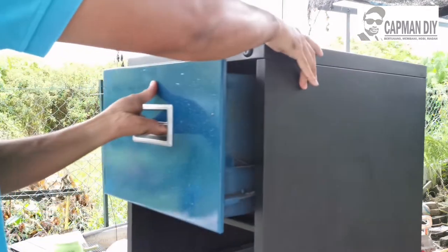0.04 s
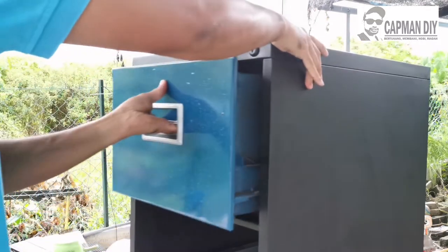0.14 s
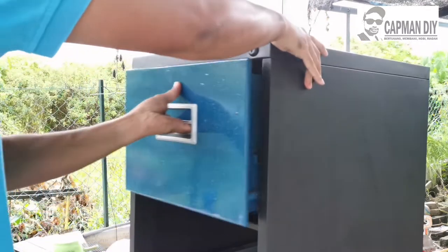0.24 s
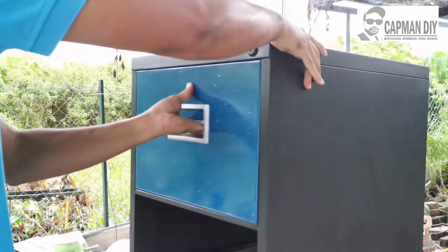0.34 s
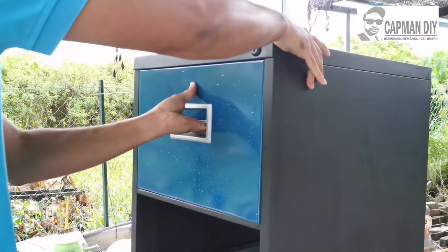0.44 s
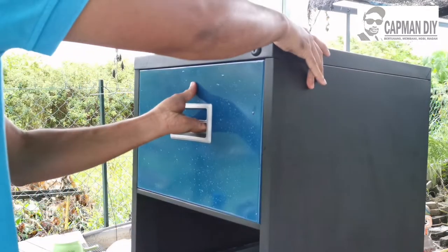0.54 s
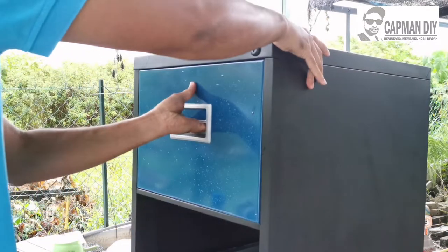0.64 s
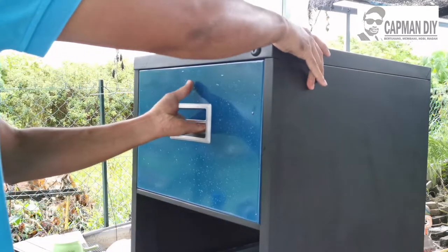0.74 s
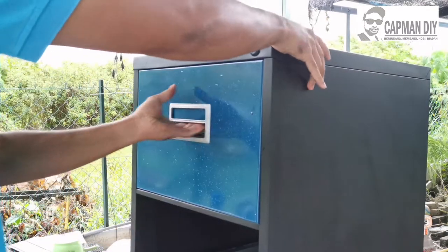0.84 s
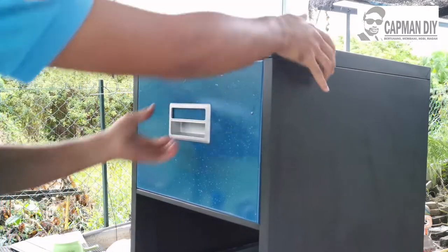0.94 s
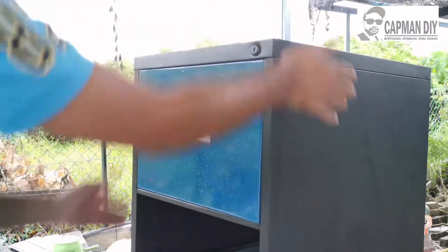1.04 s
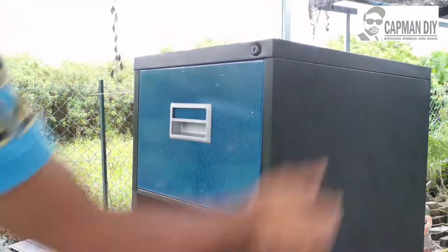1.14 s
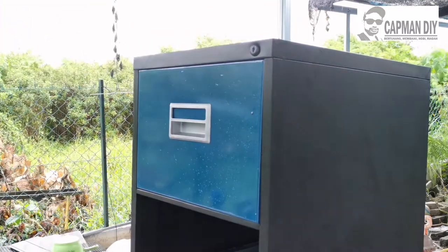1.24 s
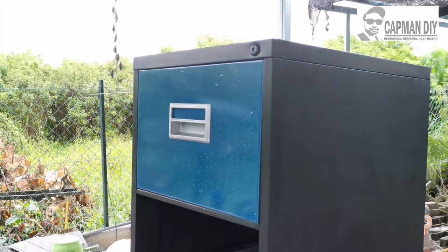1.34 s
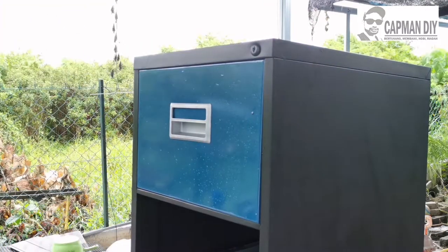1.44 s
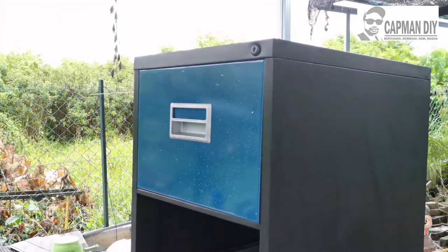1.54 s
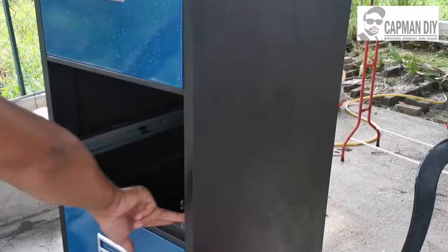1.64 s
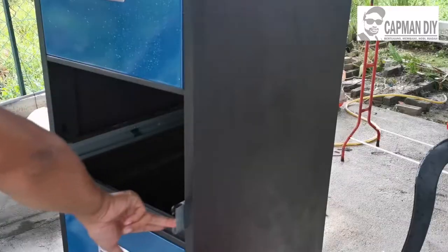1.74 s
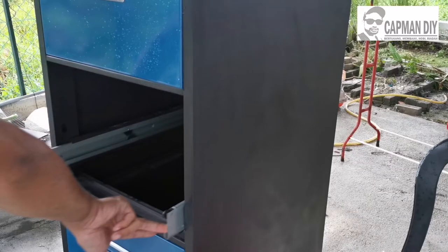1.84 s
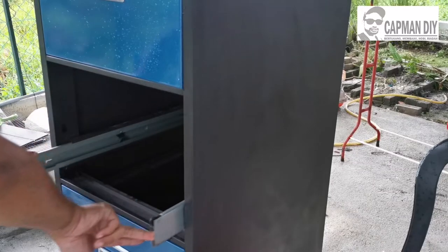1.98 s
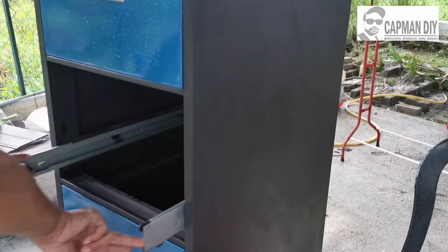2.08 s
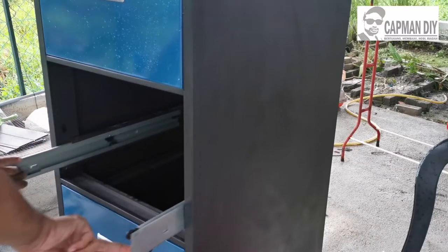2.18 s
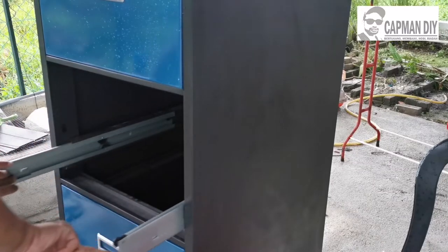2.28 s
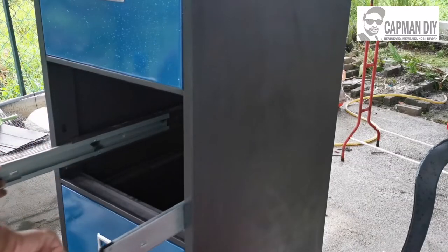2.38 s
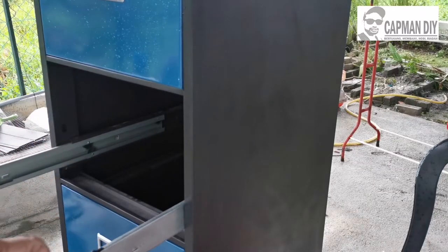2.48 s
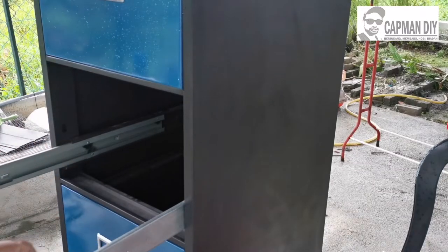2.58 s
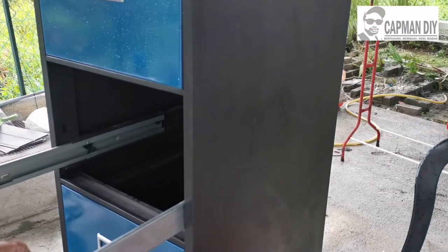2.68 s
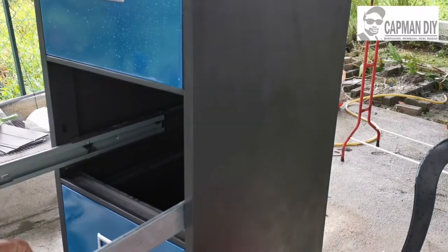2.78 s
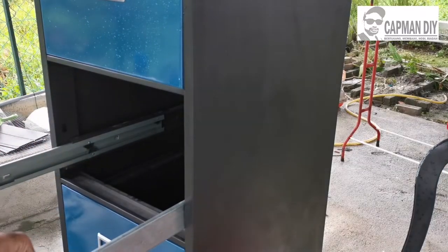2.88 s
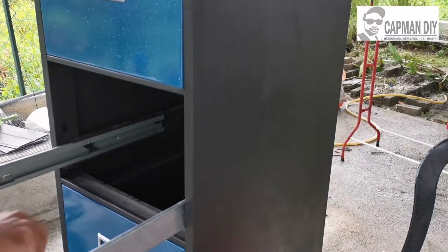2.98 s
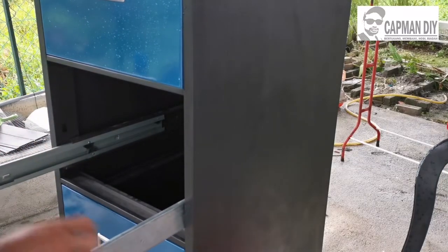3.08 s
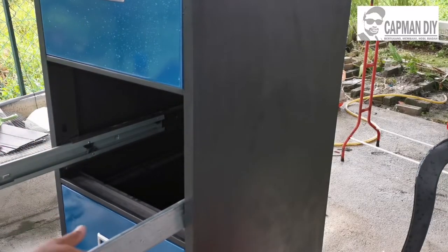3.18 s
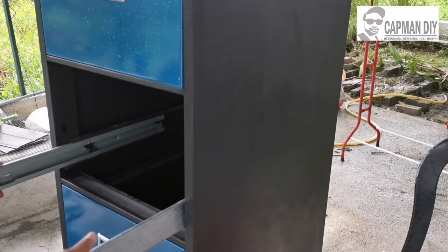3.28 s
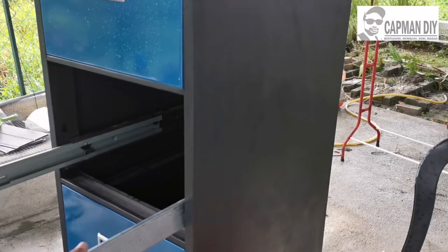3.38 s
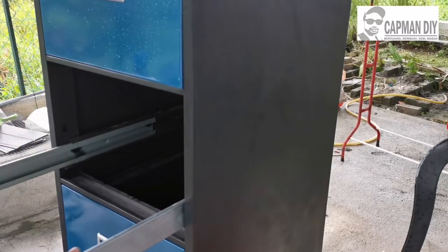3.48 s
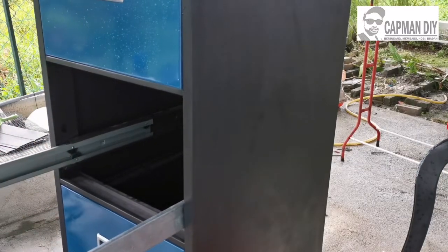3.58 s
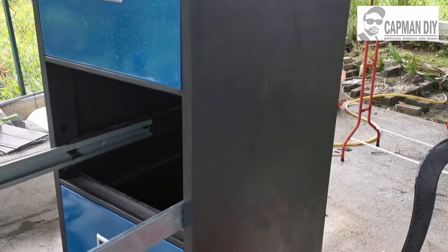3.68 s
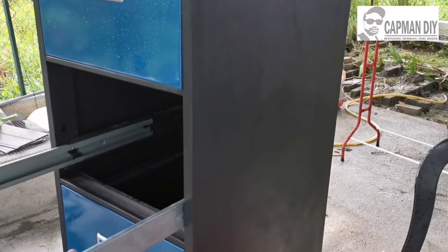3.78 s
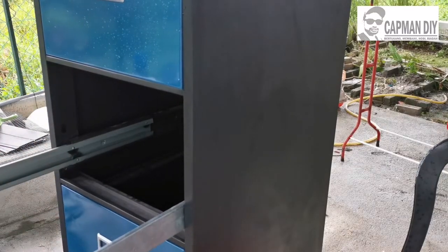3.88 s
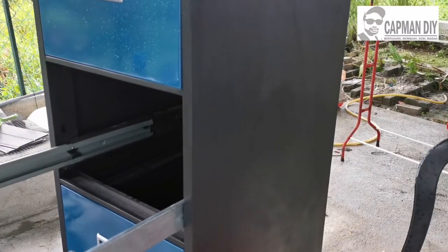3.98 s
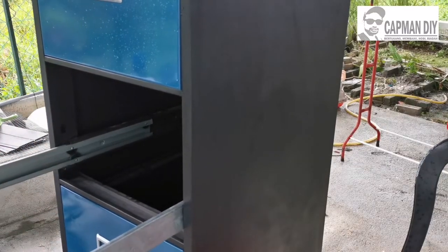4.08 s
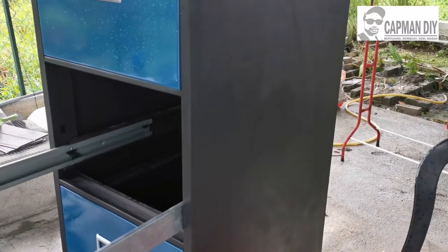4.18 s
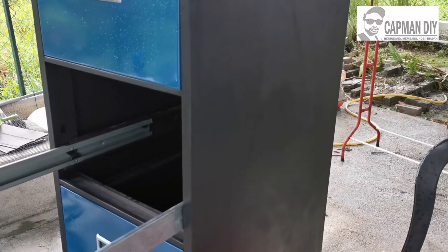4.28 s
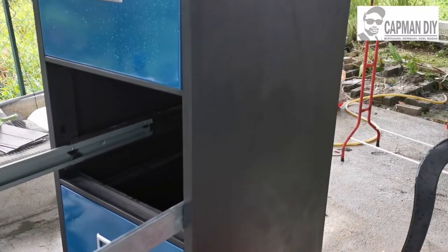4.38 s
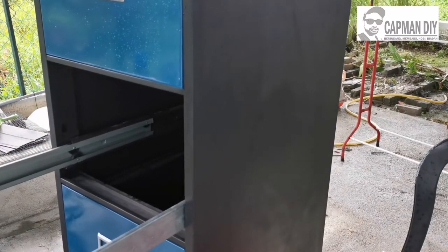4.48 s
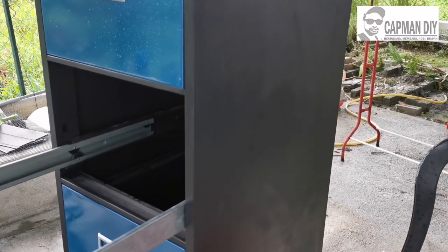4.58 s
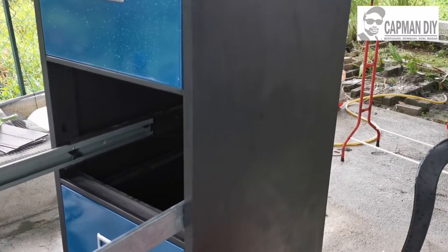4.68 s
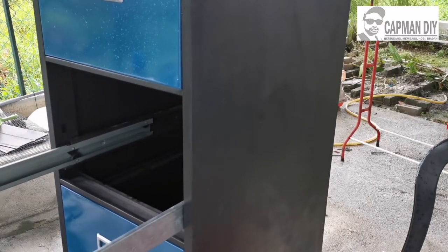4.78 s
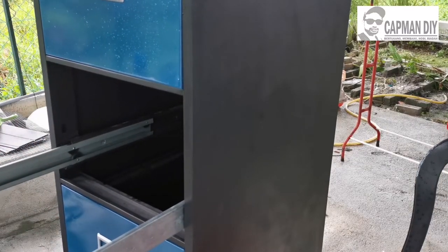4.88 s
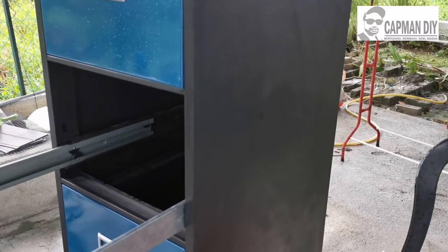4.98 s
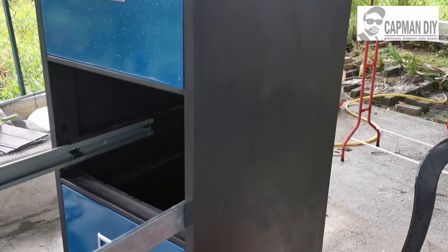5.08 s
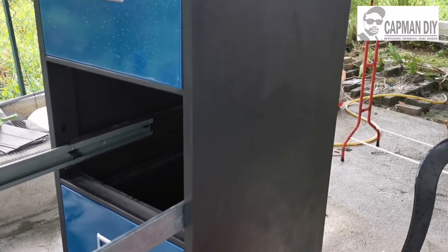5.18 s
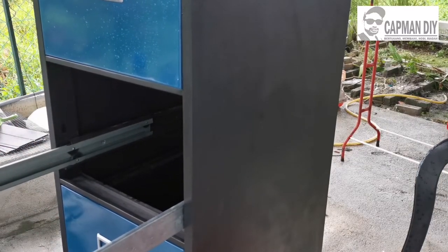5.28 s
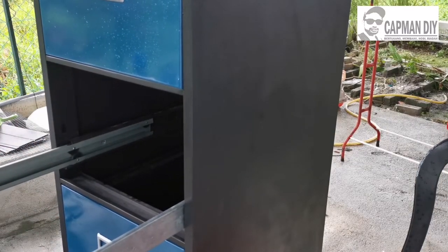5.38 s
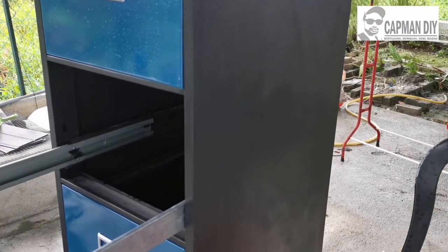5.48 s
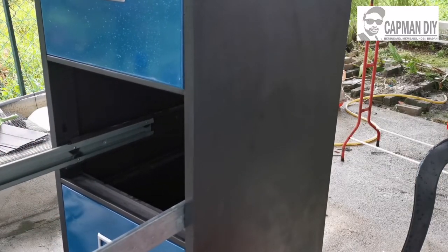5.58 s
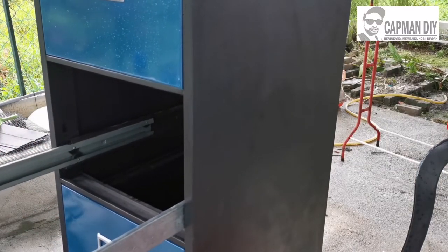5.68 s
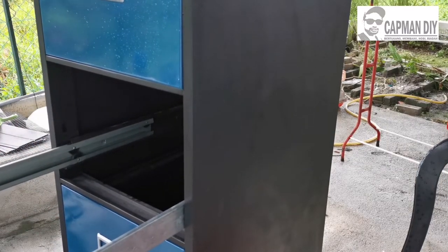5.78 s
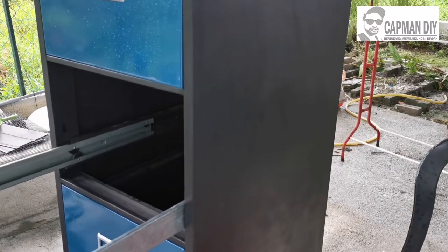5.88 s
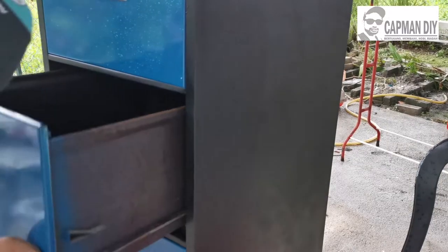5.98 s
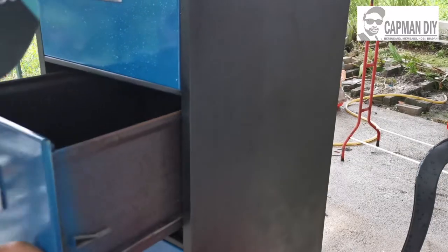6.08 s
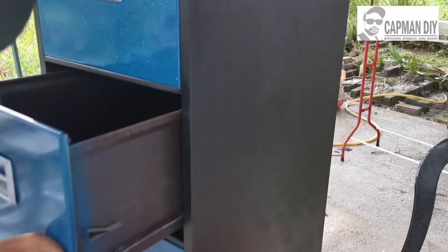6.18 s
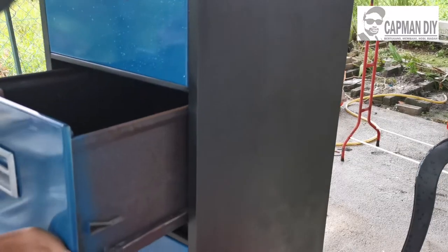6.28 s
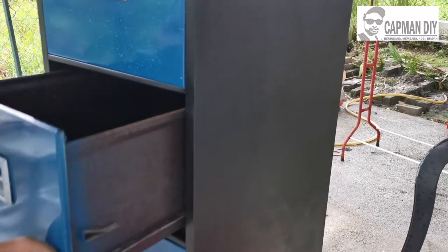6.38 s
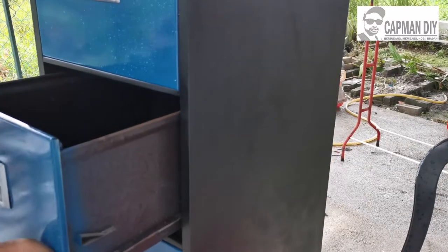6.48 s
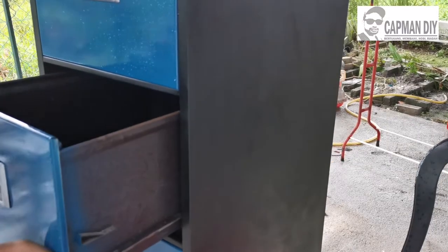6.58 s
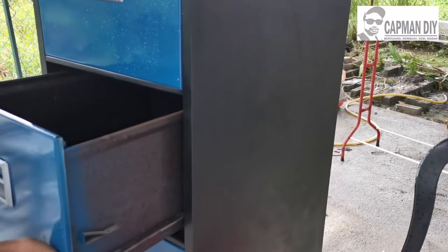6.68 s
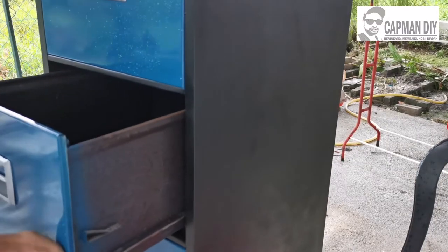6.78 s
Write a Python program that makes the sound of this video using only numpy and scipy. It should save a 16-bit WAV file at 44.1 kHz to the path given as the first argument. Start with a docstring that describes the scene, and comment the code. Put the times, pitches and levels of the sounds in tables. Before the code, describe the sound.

A steel drawer rumbles inward on ball slides and thuds, then after a lull with a low wavering hum comes a cluster of hard, ringing metal clangs. A far motorbike revs up until an abrupt cut to thinner air. Then lighter rail scrapes and knocks follow, with a sharper clank and clattering drawer. Close stereo microphone outdoors, faint insects.

```python
"""Steel drawers and rails slide and knock in a sheet-steel cabinet in a yard: ball races hiss and rattle
as modulated noise, panels boom as resonance-filtered noise, blows clang as decaying noise with ringing modes.
Behind them a low hum wavers, a far-off single-cylinder motorbike speeds up as a sum of harmonics, insects sing
as narrow-band noise. At 3.8 s the scene cuts: cabinet further left, motorbike gone, thinner air."""
import sys
import numpy as np
from scipy import signal
from scipy.fft import rfft, irfft, next_fast_len
from scipy.io import wavfile
from scipy.ndimage import uniform_filter1d, map_coordinates

SR = 44100
rng = np.random.default_rng(int(sys.argv[2]) if len(sys.argv) > 2 else 0)


def int16_out(signal):
    """Quantize to a 16-bit WAV file."""
    q = np.round(np.clip(np.atleast_2d(signal).T, -1, 1) * 32767)
    wavfile.write(sys.argv[1], SR, q.astype(np.int16))


N = 301644
CUT_S = 3.8  # the scene cuts
THIN_DB = -3.5  # knocks carry less bass after the cut

# Blows on the steel. Each row: time in seconds, level in dB, body then edge against the clang in dB,
# nominal t60 in seconds, rise in seconds, ring of the struck part in Hz.
BLOWS = [(0.076, -32, -8, 6, 0.56, 0.0045, 2220), (0.119, -29.5, -9.5, -2.5, 0.25, 0.0026, 2280),
         (.243, -19, 5, -4, 0.21, 0.0044, 600), (0.3297, -31.5, -8, -2, 0.38, 0.0058, 1970),
         (0.604, -48.5, 7, 6.5, 0.42, 0.0012, 1980), (0.828, -48.5, 17, 3, 0.42, 0.0039, 1650),
         (1.0686, -46.5, 6, -3, 1, 0.006, 2060), (1.1652, -35, 1.5, 2, 0.34, 0.0012, 1560),
         (1.318, -26.5, -1, 3, 0.22, 0.0015, 2580), (1.379, -27, -10, 0.5, 0.54, 0.007, 2050),
         (1.3931, -16.5, -4.5, -6, 0.29, 0.00064, 1872), (1.572, -25, -1.5, -4.5, 0.17, 0.0023, 2090),
         (1.6923, -33.5, 5, -10, 0.25, 0.002, 1600), (1.788, -29, -6.5, 1.5, 0.27, 0.0023, 1610),
         (1.951, -23, -1, 6, 0.19, 0.018, 2560), (2.0083, -19.5, -1, -1, 0.39, 0.0003, 2150),
         (2.419, -49, -13, 2.5, 1, 0.0023, 3620), (2.508, -34.5, -1, -1, 0.39, 0.0015, 2020),
         (2.695, -32, 6.5, 4, 0.26, 0.003, 694), (3.669, -52.5, -4, -2, 0.35, 0.0025, 1565),
         (3.8025, -34, 0, -3, 0.9, 0.0064, 2600), (3.918, -30.5, -5, -5.5, 0.16, 0.0052, 2030),
         (3.9911, -28, -2.5, -0.5, 0.56, 0.025, 1640), (4.1296, -38, 0.5, 10, 0.28, 0.0042, 1920),
         (4.642, -51, -4, 8, 0.38, 0.003, 2700), (5.162, -36, -7, -10.5, 0.36, 0.0069, 2000),
         (5.186, -36.5, -3, -11, 0.28, 0.0044, 1130), (5.236, -36.5, -14.5, -6.5, 0.25, 0.0019, 2890),
         (5.586, -38.5, -9.5, -2.5, 0.9, 0.0057, 2130), (5.689, -34, -6, 9.5, 0.37, 0.0011, 2300),
         (5.8472, -22, -1.5, 2, 0.28, 0.001, 2190), (6.011, -34.5, -3.5, 8, 0.26, 0.0021, 2960),
         (6.0394, -28, -52, -7.5, 0.21, 0.0012, 3930), (6.178, -31.5, -7.5, -0.5, 0.28, 0.0027, 2220),
         (6.196, -27.5, 0, -5.5, 0.42, 0.0072, 2170), (6.275, -27, -7, -6.5, 0.22, 0.0023, 2940),
         (6.348, -28.5, -6.5, -3, 0.3, 0.0019, 4470), (6.48, -25.5, -0.5, 0.5, 0.26, 0.019, 2120),
         (6.705, -41, -5.5, -12, 0.24, 0.0027, 1750), (6.735, -38, -13, -1, 0.23, 0.0025, 5060)]
# Clearest modes of the sheet. Each row: frequency in Hz, width in Hz, nominal level above the rest in dB.
SHEET_MODES = [(531, 14, 2.5), (597, 9.7, 2.5), (659, 5.6, 5.5), (767, 34, 4), (851, 9.2, 5),
               (1000, 83, 3.5), (1370, 18, -2.5), (1730, 67, -2.5), (2164, 22, 0.5), (2326, 19, 1),
               (3100, 61, -2.5), (3476, 40, 3), (4820, 1960, 7)]
# Damping rises with pitch. Each row: frequency in Hz, share of the blow's t60.
DAMPING = [(300, 2.74), (1500, 1.14), (12000, 0.82)]
# Low modes of the cabinet panels. Each row: frequency in Hz, width in Hz, relative level in dB.
PANEL_MODES = [(59.5, 22, -3.5), (94.6, 26.5, 1.5), (135.8, 24.8, 6.5), (161.2, 15, 2.5), (190.8, 23, 1.5),
               (264.6, 47, -1), (304.6, 40.4, -1.5)]


def amp(db):
    """Decibel law: level in dB to amplitude ratio."""
    return 10 ** (np.asarray(db) / 20)


def unit(x):
    """Normalisation by mean power: scaled to rms 1."""
    return x / np.sqrt(np.mean(x ** 2) + 1e-20)


def along(points, hz):
    """Piecewise-linear interpolation of (Hz, value) points on a logarithmic frequency axis."""
    f, v = np.transpose(points)
    return np.interp(np.log(hz + 1), np.log(f + 1), v)


def curves(rows):
    """Linear interpolation in time: one value per sample for each column after the time."""
    s, *cols = np.transpose(rows)
    return [np.interp(np.arange(N) / SR, s, c) for c in cols]


def wobble(rate):
    """Band-limited fluctuation: a spline through random knots, rate knots a second."""
    return map_coordinates(rng.standard_normal(int(N * rate / SR) + 4), [np.arange(N) * rate / SR])


def smoothed(x, bands, frames):
    """Local averaging of a time-frequency field over neighbouring bands, then frames."""
    return uniform_filter1d(uniform_filter1d(x, size=bands, axis=0), size=frames, axis=1)


def filtered(x, response):
    """Linear filtering: the spectrum of x times a complex response of frequency."""
    m = next_fast_len(x.shape[-1] + 8192)
    return irfft(rfft(x, m) * response(np.fft.rfftfreq(m, 1 / SR)), m)[..., :x.shape[-1]]


def resonances(modes):
    """Modal superposition: causal second-order resonances of alternating sign."""
    return lambda f: sum((-1) ** k * amp(db) * 1j * f * w / (c * c - f * f + 1j * f * w)
                         for k, (c, w, db) in enumerate(modes))


def pair(size, colour):
    """Spatial coherence: mid and side noise share power by the left-right likeness; stereo rms is 1."""
    # Each row: frequency in Hz, left-right likeness as a correlation.
    likeness = [(30, .75), (70, .95), (180, .99), (350, .96), (700, .86), (1400, .72), (2800, .45),
                (6000, .3), (15000, .35)]

    def mid_side(hz):
        turn = np.arccos(np.clip(along(likeness, hz), 0, 1)) / 2
        return colour(hz) * [np.cos(turn), np.sin(turn)]

    mid, side = filtered(rng.standard_normal((2, size)), mid_side)
    return unit(np.array([mid + side, mid - side]))


def steel(spectrum, dense_db, modes=SHEET_MODES):
    """Modal density: a broad spectrum carries a thicket of small modes and a few clear resonant peaks."""
    thicket = rng.standard_normal(400)
    shaken_db = 3 * rng.standard_normal(len(modes))  # each contact wakes the modes unequally

    def colour(hz):
        peaks = 1 + sum(amp(2 * (db + more)) / (1 + (2 * (hz - c) / w) ** 2)
                        for (c, w, db), more in zip(modes, shaken_db))
        small_db = dense_db * np.interp(hz / 45, np.arange(400), thicket)
        return amp(along(spectrum, hz) + small_db) * np.sqrt(peaks)

    return colour


def sliding():
    """Rolling contact: balls judder along the races; the same judder drums the steel, and panels boom."""
    # Scrape in the drawer races. Each row: frequency in Hz, relative density in dB per Hz.
    drawer_scrape = [(530, -24), (900, 1), (1280, -5), (2220, 1.5), (2690, -3.5), (5680, -14.5),
                     (10600, -18.5), (16000, -31.5)]
    # Scrape of the bare rail run out. Each row: frequency in Hz, relative density in dB per Hz.
    rail_scrape = [(710, -32), (1200, -7.5), (2620, -5), (5130, -6), (7500, -19), (10800, -17.5),
                   (16000, -29.5)]
    # Drumming of the drawer. Each row: frequency in Hz, relative density in dB per Hz.
    drawer_drum = [(180, -42.5), (300, 6.5), (521, -1), (1300, -18), (1690, -22.5), (2860, -120)]
    # Drumming of the bare rail. Each row: frequency in Hz, relative density in dB per Hz.
    rail_drum = [(180, -34), (300, -16), (791, -4), (1300, -7.5), (1690, -30), (2860, -120)]
    # Modes of the bare rail. Each row: frequency in Hz, width in Hz, nominal level above the rest in dB.
    rail_modes = [(527, 38, 8), (806, 66, 12), (980, 200, 5.5), (1725, 150, 2), (2150, 320, 6.5),
                  (2690, 170, 7)]
    # Bare rail run: start of its fade-in and start of its fade-out, in seconds.
    rail_from, rail_to = (4.2, 5.1)
    scrape_db, boom_db, drum_db = motion()
    bare = np.interp(np.arange(N) / SR, [rail_from, rail_from + 0.08, rail_to, rail_to + 0.08],
                     [0, np.pi / 2, np.pi / 2, 0])

    def either(drawer, rail):  # equal-power crossfade
        drawer_noise = np.cos(bare) * pair(N, steel(drawer, dense_db=4.0))
        return drawer_noise + np.sin(bare) * pair(N, steel(rail, dense_db=3.5, modes=rail_modes))

    judder = wobble(30)
    scrape_gain = amp(scrape_db + 2.16 * judder + 0.3 * wobble(220)) * rattles()
    scrape = scrape_gain * patchy(either(drawer_scrape, rail_scrape), depth_db=1.0)
    drum = amp(drum_db + 2.2 * judder + 2.13 * wobble(70)) * either(drawer_drum, rail_drum)
    panels = resonances(PANEL_MODES)
    # thin sheet sends out no deep bass
    boom_noise = pair(N, lambda hz: panels(hz) / (1 + (55 / (hz + 1)) ** 4))
    boom = amp(boom_db + 1.9 * wobble(11)) * boom_noise
    return scrape + drum + boom


STEP = 64  # samples between points of the slow levels


def swelling(s, rise, hold, t60):
    """Reverberant energy balance: power rises, holds until hold seconds after s, then decays exponentially."""
    t = np.arange(0, N + STEP, STEP) / SR - s
    return np.clip(t / rise, 0, 1) ** 2 * amp(-120 * np.clip(t - hold, 0, None) / t60)


def motion():
    """Incoherent power addition: strokes drive scrape, boom and drumming levels; knocks add to the boom."""
    # Runs of a drawer or rail. Each row: start in seconds, length in seconds,
    # scrape of the rails in dB, rumble of the panels in dB.
    strokes = [(-0.13, 0.17, -33.5, -29.5), (0.0, 0.15, -33, -30.5), (0.119, 0.14, -33.5, -34),
               (0.96, 0.53, -52.5, -40.5), (1.392, 0.25, -43.5, -31.5), (1.618, 0.23, -45, -36.5),
               (1.996, 0.12, -35.5, -30), (2.36, 0.38, -61.5, -37), (2.643, 0.12, -37.5, -38.5),
               (3.808, 0.38, -46.5, -42.5), (4.219, 0.26, -47, -51.5), (4.477, 0.19, -48.5, -48.5),
               (4.581, 0.26, -50.5, -47.5), (5.718, 0.43, -47, -45.5), (6.159, 0.24, -41, -41),
               (6.476, 0.12, -79, -42)]
    speed_up_s, scrape_t60_s, panel_t60_s = 0.12, 0.58, 1.34
    knock_boom_db, knock_swell_s = -17, 0.02  # boom after a knock, against its body level
    drum_share, drum_offset_db = 0.4, -3.5  # drumming lies between scrape and boom
    scrape = sum(amp(2 * db) * swelling(s, speed_up_s, length, scrape_t60_s) for s, length, db, _ in strokes)
    boom = sum(amp(2 * db) * swelling(s, speed_up_s, length, panel_t60_s) for s, length, _, db in strokes)
    for s, db, body_db, *_ in BLOWS:
        level_db = db + body_db + knock_boom_db + THIN_DB * (s > CUT_S)
        boom = boom + amp(2 * level_db) * swelling(s, knock_swell_s, knock_swell_s, panel_t60_s)
    slow_db = 10 * np.log10(np.array([scrape, boom]) + 1e-10)
    scrape_db, boom_db = np.repeat(slow_db, STEP, axis=1)[:, :N]
    return scrape_db, boom_db, drum_offset_db + drum_share * scrape_db + (1 - drum_share) * boom_db


def rattles():
    """Poisson impacts: loose balls clatter in the races, so the gain jumps at random and falls back."""
    per_second, decay_s, depth_db = 65, 0.0036, -13.5
    hits = (rng.random(N) < per_second / SR) * rng.exponential(size=N)
    return unit(1 + amp(depth_db) * signal.lfilter([1], [1, -np.exp(-1 / (decay_s * SR))], hits))


def patchy(x, depth_db):
    """Time-frequency modulation: patches of random gain drift in pitch and time."""
    z = signal.stft(x, nperseg=256)[2]
    field = smoothed(rng.standard_normal(z.shape[1:]), bands=5, frames=10)
    return unit(signal.istft(z * amp(depth_db * unit(field)), nperseg=256)[1][:, :N])


def knocks():
    """Impact excitation: each blow fills the dense modes with a noisy clang that loses its treble first."""
    # Struck sheet. Each row: frequency in Hz, relative density in dB per Hz.
    clang_spectrum = [(180, -47.5), (270, -4), (398, -12), (774, -6.5), (1480, -6.5), (2280, -7),
                      (6500, -19), (10700, -21.5), (16000, -30)]
    ring_db, soft_s = -6, 0.0048  # clear modes; blows slower than soft_s hardly wake them
    size = SR // 2
    out, t = np.zeros((2, N + size)), np.arange(size) / SR
    for s, db, body_db, edge_db, t60, rise, part_hz in BLOWS:
        sheet = steel(clang_spectrum, dense_db=3.5)
        lean = [(350, body_db + THIN_DB * (s > CUT_S)), (800, body_db), (2500, 0.0036), (8000, edge_db)]
        # the part that was hit rings most, a heavy blow shakes all alike
        part_gain = np.clip((-13.0 - db) / 14, 0.2, 1.1)

        def colour(f):
            struck = 1 + part_gain * np.exp(-(np.log(f / part_hz + 1e-9) / 0.1) ** 2)
            return sheet(f) * amp(along(lean, f)) * struck

        hz, frame, z = signal.stft(pair(size, colour), SR, nperseg=128)
        slope = frame / (max(t60, 0.03) * along(DAMPING, hz)[:, None])
        # bands flare up and fade
        uneven = unit(smoothed(rng.standard_normal(z.shape[1:]), bands=2, frames=24))
        # the quicker the rise, the stronger the fast first drop
        punch = 0.66 * np.exp(-rise / 0.0019) * amp(-60 * frame / 0.049)
        z = z * amp(1.3 * uneven) * (amp(-60 * slope) + punch)
        clang = signal.istft(z, SR, nperseg=128)[1][:, :size]
        tones = ringing(lambda f: along(clang_spectrum, f) + along(lean, f), part_hz, t60, t[:size // 2])
        clang[:, :size // 2] += amp(ring_db) * np.exp(-rise / soft_s) * tones
        chatter = uniform_filter1d(uniform_filter1d(rng.standard_normal(size), size=160), size=80)
        rattle = amp(0.75 * unit(chatter))  # loose parts chatter
        crack = 0.39 * np.exp(-t / 0.0003) * (rise < 0.0026)  # hard blows only
        swell = 1 - 0.76 * np.exp(-t / max(rise, 0.0003)) + crack
        out[:, round(s * SR):][:, :size] += amp(db) * swell * rattle * clang
    return out[:, :N]


def ringing(colour_db, part_hz, t60, t):
    """Free vibration: the clearest modes and the struck part start together and decay as clean tones."""
    part_db, life = 8, 0.69  # struck part above the rest; share of the clang's t60
    hz, _, mode_db = np.transpose(SHEET_MODES + [(part_hz, 0, part_db)])[:, :, None]
    chance = rng.standard_normal((4, len(hz), 1))
    hz = hz * (1 + 0.03 * chance[0])
    gain = amp(colour_db(hz) + mode_db + 5.4 * chance[1])
    decay = amp(-60 * t / (life * np.clip(t60, 0.03, 0.35) * along(DAMPING, hz)))
    tones = gain / np.linalg.norm(gain) * decay * np.sin(2 * np.pi * hz * t)
    return (amp(hz / 700 * chance[2:]) * tones).sum(axis=1)  # high modes beam unevenly to the ports


def toll():
    """Modal decay: every knock leaves the panel modes ringing, each at its own random strength."""
    level_db, swell_s, t60_s = -18.5, 0.011, 0.97  # level against the knock's body
    out, t = np.zeros(N + SR), np.arange(SR * 3 // 4) / SR
    hz, _, mode_db = np.transpose(PANEL_MODES)[:, :, None]
    envelope = amp(mode_db - 60 * t / t60_s) * (1 - np.exp(-t / swell_s))
    ring = envelope / (1 + (90 / hz) ** 4) * np.sin(2 * np.pi * hz * t)  # deep bass radiates weakly
    chances = rng.standard_normal((len(BLOWS), len(PANEL_MODES)))
    for (s, db, body_db, *_), chance in zip(BLOWS, chances):
        gain = amp(db + body_db + level_db + THIN_DB * (s > CUT_S))
        out[round(s * SR):][:len(t)] += gain * amp(3.35 * chance) @ ring
    return out[:N]


def bump():
    """Damped oscillation: one dull push on the microphone's stand, stronger on the left."""
    t = np.arange(N) / SR - 4.519
    return amp([[-25], [-31]]) * (t > 0) * -np.sin(2 * np.pi * 62 * t) * np.exp(-abs(t) / 0.017)


def motorbike():
    """Harmonic series: a rising firing rate drives the exhaust orders, which stop at once at the cut."""
    # Each row: time in seconds, nominal firings a second, level in dB.
    engine = [(2.7, 27, -36), (3.0, 30.1, -41.5), (3.25, 30.7, -45), (3.45, 31.8, -42.5),
              (3.55, 32.4, -40.5), (3.8, 32.2, -40)]
    # Low orders. Each row: multiple of the firing rate, relative level in dB.
    exhaust = [(2, 0.5), (3, -10), (4, 5.5), (6, -13), (7, -14), (8, -16), (9, -8), (11, -10.5), (12, -22),
               (14, -12), (15, -11.5), (20, -18), (25, -24)]
    firing_s = 3.729  # one firing falls here
    waver_db, waver_rad, wavers_per_s = 0.2, 0.022, 18  # far-off orders waver, more with each order up
    rate, db = curves(engine)
    turn = np.cumsum(rate * (1 + 0.0013 * wobble(26))) / SR
    turn = turn - turn[round(firing_s * SR)]
    orders = exhaust + [(order, -25) for order in range(16, 30)]  # the sharp puff, relative dB
    t = np.arange(N) / SR

    def waver():
        return np.interp(t * wavers_per_s, np.arange(100), rng.standard_normal(100))

    tone = np.zeros(N)
    for order, level in orders:
        gain = amp(level + waver_db * order * waver())
        flip = np.pi * (order < 3.5)  # the lowest orders swing against the sharp puff
        tone += gain * np.cos(order * (2 * np.pi * turn + waver_rad * waver()) + flip)
    heard = np.clip((t - 2.6) / 0.63, 0, 1) * np.clip((CUT_S - t) / 0.0013, 0, 1)
    return amp(db + 0.6 * wobble(20)) * heard * unit(tone)


def hum():
    """Frequency and amplitude modulation: a low hum wavers for about a second."""
    # Each row: time in seconds, frequency in Hz, rms level in dB before the wavering.
    glide = [(0.55, 103.8, -55), (0.642, 99.7, -51), (0.648, 93.1, -47.5), (1.344, 102.8, -41),
             (1.4, 107, -43.5)]
    hz, db = curves(glide)
    t = np.arange(N) / SR
    heard = np.clip((t - 0.45) / 0.055, 0, 1) * np.clip((1.45 - t) / 0.09, 0, 1)
    return np.sqrt(2) * amp(db + 5.1 * wobble(25)) * heard * np.sin(2 * np.pi * np.cumsum(hz) / SR)


def yard():
    """Stationary noise: still air, fuller before the cut, a wavering insect band and microphone hiss."""
    # Yard air. Each row: frequency in Hz, relative density in dB per Hz.
    air_spectrum = [(15, -26), (30, -4), (60, -1), (130, -2.5), (250, -10), (607, -18), (1300, -28.5),
                    (3720, -38), (5880, -43.5), (16000, -59.5)]
    # Insect band: centre in Hz, width in Hz, mean level in dB before the cut, then after it.
    hz, width, near_db, far_db = (4624, 331.5, -71.5, -76)
    before = np.arange(N) < CUT_S * SR
    air_gain = amp(-57.0 + 11.9 * before + 2.1 * wobble(4.05))
    air = air_gain * pair(N, lambda f: amp(along(air_spectrum, f)))
    song_gain = amp(np.where(before, near_db, far_db) + 1.4 * wobble(1.89) + 1.4 * wobble(38))
    song = song_gain * pair(N, lambda f: np.exp(-((f - hz) / width) ** 2))
    return air + song + amp(-77.5) * rng.standard_normal((2, N))


def scene():
    """Interaural cues: after the cut the cabinet stands further left, earlier and louder there."""
    # Each row: frequency in Hz, left over right in dB.
    to_left = [(300, 0.9), (3000, 1.5), (10000, 2.5), (14000, 3.5)]
    lead_s = 0.00014  # left port hears first
    cabinet = sliding() + knocks() + toll()
    side = np.array([[1], [-1]])

    def lean_left(hz):  # half the lead and level on each side
        return amp(along(to_left, hz) * side / 2) * np.exp(1j * np.pi * hz * lead_s * side)

    led = filtered(cabinet, lean_left)
    placed = np.where(np.arange(N) < CUT_S * SR, cabinet, led)
    return placed + bump() + motorbike() + hum() + yard()


def record(dry):
    """Transducer response: ports of unequal colour, each with a treble resonance, below a band limit."""
    # Each row: frequency in Hz, left gain in dB, right gain in dB.
    port_gains = [(30, 2.5, -1), (150, 1.55, 0.76), (1500, 0.8, -0.8), (6100, 0, 0), (7000, 1.5, 6.5),
                  (8700, 2, 0), (10340, 8, -5.5), (11280, 7, -5.5), (12500, 1.5, 0), (15000, -4, -4.5)]
    top_hz = 15900
    hz_at, *ports_db = np.transpose(port_gains)

    def response(hz):
        gains_db = [along(np.transpose([hz_at, db]), hz) for db in ports_db]
        return amp(gains_db) * (hz < top_hz)

    return filtered(dry, response)


dry = scene()
out = record(dry)
int16_out(out)
```